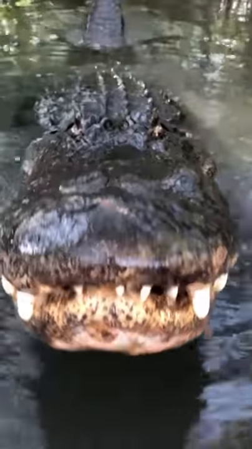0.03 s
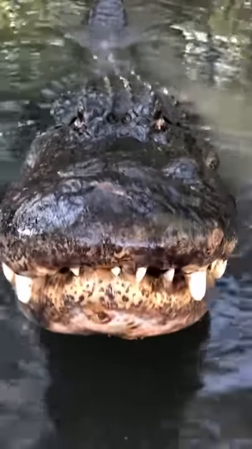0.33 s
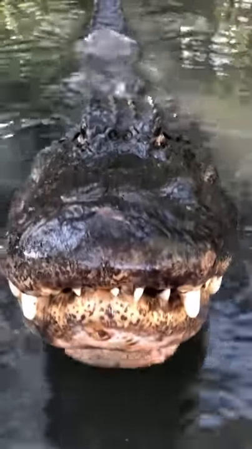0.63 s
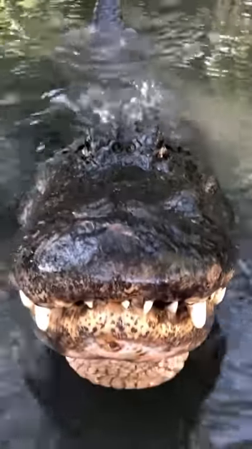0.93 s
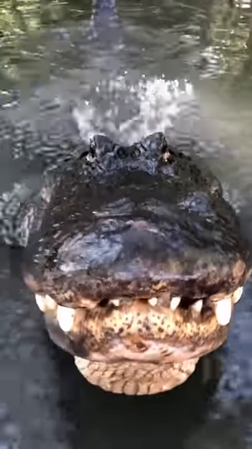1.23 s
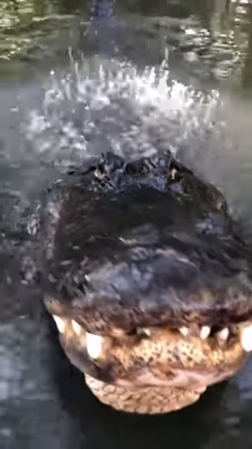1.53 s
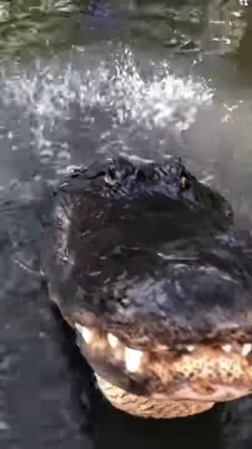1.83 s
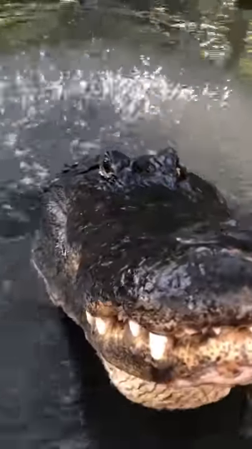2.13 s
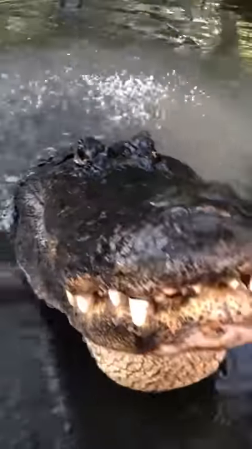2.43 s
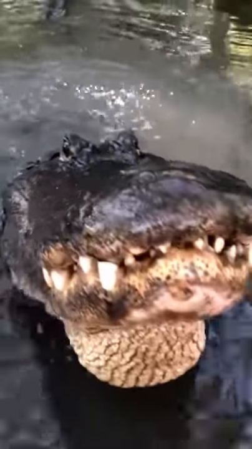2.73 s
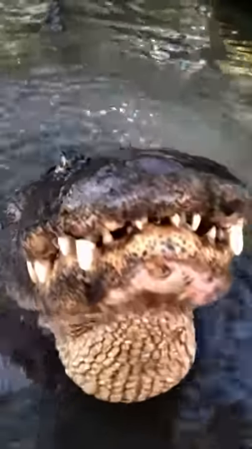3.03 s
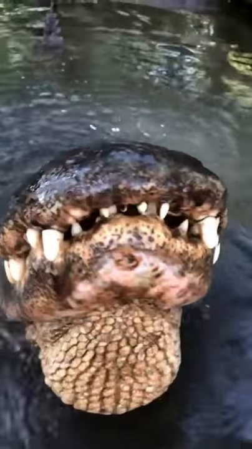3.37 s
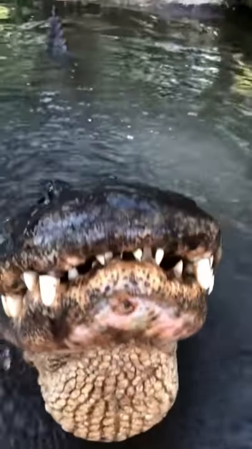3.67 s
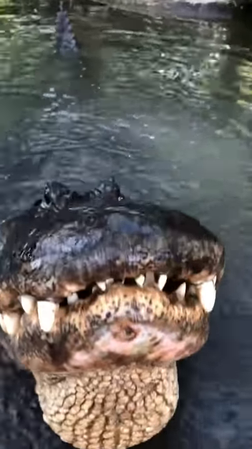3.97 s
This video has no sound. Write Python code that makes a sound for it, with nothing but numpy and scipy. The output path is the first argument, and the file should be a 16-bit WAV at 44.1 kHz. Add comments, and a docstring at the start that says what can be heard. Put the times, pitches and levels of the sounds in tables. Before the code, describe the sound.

Close to the microphone outdoors, an alligator makes a low pulsing rumble while water sprays and plops around it. It then breaks into a loud, hissing, guttural bellow that slows into rapid grunts.

```python
"""A pond, the microphone just in front of an alligator's snout. Water trickles and a bird whistles once;
then the animal's body throbs 15-19 times a second and throws up spray from its back. After a far bird's
thin note the throat opens into a roaring bellow: irregular slaps of the vocal folds boom in the body
and gate a rush of air through the throat, slowing into separate grunts."""
import sys
import numpy as np
from scipy import signal
from scipy.fft import rfft, irfft
from scipy.io import wavfile
from scipy.ndimage import uniform_filter1d

SR = 44100
rng = np.random.default_rng(int(sys.argv[2]) if len(sys.argv) > 2 else 0)


def wav_out(sig):
    """Save sig, one row per channel (or a flat mono array), as 16-bit PCM at SR to the path in sys.argv[1]."""
    wavfile.write(sys.argv[1], SR, np.round(np.clip(np.atleast_2d(sig).T, -1, 1) * 32767).astype(np.int16))


N = 176400
T = np.arange(N) / SR


def amp(db):
    """Decibels to gain."""
    return 10 ** (np.asarray(db) / 20)


def unit(x, start=0, end=4):
    """Scales to rms 1 over a span of seconds."""
    return x / np.sqrt(np.mean(x[int(start * SR):int(end * SR)] ** 2) + 1e-20)


def curve(rows, column=1):
    """Joins one column of a time table by straight lines."""
    rows = np.array(rows)
    return np.interp(T, rows[:, 0], rows[:, column])


def level(rows, column=1):
    """Gain from a table of decibels; silent before its first point."""
    return amp(curve(rows, column)) * (T >= rows[0][0])


def noise():
    """White noise."""
    return rng.standard_normal(N)


def wander(hz):
    """Random drift of rms 1, mostly slower than hz."""
    return unit(irfft(rfft(noise()) * np.exp(-(np.fft.rfftfreq(N, 1 / SR) / hz) ** 2), N))


def colour(x, points):
    """Causal filter through points of f/Hz, gain/dB."""
    hz, db = np.transpose(points)
    f = abs(np.fft.fftfreq(16384, 1 / SR)) + 1
    log_gain = np.log(amp(np.interp(np.log(f), np.log(hz + 1), db)))
    response = np.fft.ifft(np.exp(np.conj(signal.hilbert(log_gain)))).real
    return signal.fftconvolve(x, response[:len(f) // 2])[:N]


def patchy(x, patch_db):
    """Lets small patches of time and pitch stand out at random."""
    spectra = signal.stft(x, nperseg=512)[2]
    field = rng.standard_normal(spectra.T.shape).T
    field = uniform_filter1d(uniform_filter1d(field, size=3, axis=0), size=6, axis=1)
    return signal.istft(spectra * amp(patch_db * field / field.std()), nperseg=512)[1][:N]


def resonate(x, hz, width, order=1):
    """A resonance of gain 1 that can follow a curve; steeper with higher order."""
    turn = np.exp(2j * np.pi * np.cumsum(hz * np.ones(N)) / SR)
    pole = np.exp(-np.pi * width / SR)
    z = x / turn
    for _ in range(order):
        z = signal.lfilter([1 - pole], [1, -pole], z + 1e-18)
    return 2 * (turn * z).real


def throat(x, table, stretch=1, wobble=0):
    """Steep resonances that stretch together; each wavers on its own by the share wobble."""
    out = 0
    for hz, width, db in table:
        waver = wobble * wander(hz=25) if wobble else 0
        out += amp(db) * resonate(x, hz * (stretch + waver), width, order=2)
    return out


def beats(rate):
    """Times of the pulses along a rate curve."""
    turns = np.cumsum(curve(rate) * (T >= rate[0][0])) / SR
    return T[1:][np.diff(np.ceil(turns)) > 0]


def clicks(times):
    """Unit impulses at the given times."""
    return np.bincount(np.round(times * SR).astype(int), minlength=N)[:N] * 1.


def grains(per_s, spread_db):
    """Random clicks of uneven size and sign."""
    hits = (rng.random(N) < per_s / SR) * np.sign(noise())
    return hits * amp(spread_db * np.minimum(rng.exponential(1, N), 3))


def bubble(hz, decay, rise):
    """A ring that rises in pitch and is cut short as the bubble surfaces."""
    t = T[:SR // 12]
    tone = np.sin(2 * np.pi * hz * (t + rise * t ** 2 / 2))
    return tone * np.exp(-(t / decay) ** 2) * (1 - np.exp(-t * hz))


def bubbles(strength, per_s, low_hz, high_hz, cycles=10, sizes=24):
    """Many bubbles of many sizes, as loud as the strength curve."""
    out = 0
    for hz in np.geomspace(low_hz, high_hz, sizes):
        ring = bubble(hz, cycles / hz, rise=16)
        births = strength * unit(grains(per_s / sizes, spread_db=2.0))
        out += signal.oaconvolve(births, ring / np.linalg.norm(ring))[:N]
    return out / np.sqrt(sizes)


# ambience at the pond: f/Hz, gain/dB
POND_SPECTRUM = [(15, -45), (25, -21), (45, -3.5), (113, 0.5), (221, -6), (260, 1.5), (331, -9),
                 (1270, -13), (3930, -14), (7000, -19), (8500, -26), (15500, -31)]


def pond(db=-47):
    """Steady outdoor wash around the microphone."""
    return unit(colour(noise(), POND_SPECTRUM)) * amp(db + 0.6 * wander(hz=11.0))


# water trickling nearby: t/s, level/dB
TRICKLE_DB = [(0, -76), (.4, -60), (.8, -57), (1.2, -50.5), (1.8, -42), (2.2, -50), (2.6, -59.5)]
# spurts off the back: t/s, relative peak/dB
SPURTS = [(.452, -35), (1.186, -25.5), (1.2466, -27), (1.3089, -27), (1.3898, -25.5), (1.447, -23.5),
          (1.513, -22), (1.573, -22), (1.6422, -22.5), (1.704, -20), (1.7674, -21.5), (1.825, -23),
          (1.8878, -24.5), (1.9456, -28.5), (1.9864, -31), (2.0016, -24.5), (2.0987, -26.5), (2.162, -32),
          (2.318, -30.5)]
# spray at close range: f/Hz, gain/dB
SPRAY_SPECTRUM = [(350, -29), (520, -10), (901, -3), (2070, -2.5), (3300, -3.5), (4770, -12), (6830, -10.5),
                  (8120, -16), (15500, -23)]


def water(rise_s=0.0055, fall_s=0.018, spray_db=-10.5, bubbles_db=-20.5):
    """Spray leaps from the back in spurts; drops fall into the pond and ring as bubbles."""
    spurts = sum(amp(db) * np.exp(-np.maximum((s - T) / rise_s, (T - s) / fall_s)) for s, db in SPURTS)
    drops = colour(grains(per_s=3000, spread_db=4.5), SPRAY_SPECTRUM)
    spray = spurts * unit(patchy(drops, patch_db=4.5))
    bubbling = bubbles(spurts, per_s=320, low_hz=903, high_hz=3940)
    trickle = bubbles(amp(curve(TRICKLE_DB)), per_s=220, low_hz=604, high_hz=3540)
    return amp(spray_db) * spray + amp(bubbles_db) * bubbling + trickle


# the bird's lower voice: t/s, f/Hz, level/dB
WHISTLE = [(.535, 2780, -53), (.56, 2790, -42), (.578, 2730, -37.5), (.62, 2776, -39.5), (.675, 2830, -42),
           (.735, 2690, -53)]


def bird(upper_ratio=1.102, upper_db=-4, overtone_db=-19, echo_db=-8):
    """One thin two-voiced whistle with an echo from the trees."""
    lower = 2 * np.pi * np.cumsum(curve(WHISTLE) * (1 + 0.0036 * wander(hz=80))) / SR
    upper = upper_ratio * lower + 0.72 * wander(hz=40)
    voices = np.sin(lower) + amp(upper_db) * np.sin(upper) + amp(overtone_db) * np.sin(lower + upper)
    call = voices * level(WHISTLE, column=2) * (T < WHISTLE[-1][0])
    tail = noise() * np.exp(-T / 0.13)
    return call + amp(echo_db) * signal.fftconvolve(call, tail / np.linalg.norm(tail))[:N]


# single drops near the microphone: t/s, f/Hz, level/dB, decay/s, pitch rise/(share per s)
PLOPS = [(.968, 1200, -41, 0.018, 18), (1.19, 3580, -31.5, 0.0033, 8), (1.58, 2470, -27, 0.0053, 10),
         (1.586, 867, -28, .014, 15), (1.636, 475, -37.5, 0.025, 21), (1.764, 777, -32.5, 0.019, 44),
         (1.889, 955, -35.5, 0.017, 27), (2.005, 805, -37, 0.033, 2.8), (2.055, 1540, -19, 0.0026, 34),
         (2.1, 760, -38, .028, 18), (2.212, 657, -41, 0.021, 22), (2.316, 3100, -32, .004, 10)]


def plops():
    """Each drop leaves a bubble with a rising, unsteady ring."""
    out = np.zeros(N)
    for s, hz, db, decay, rise in PLOPS:
        ring = bubble(hz, decay, rise)
        out[round(s * SR):][:len(ring)] += ring * amp(db + 2 * wander(hz=150)[:len(ring)])
    return out


# throbs of the body: t/s, rate/Hz
THROB_RATE = [(1.162, 14.66), (1.4, 14.78), (1.7, 16.88), (2.1, 19.23), (2.4, 19.37)]
# its resonances: f/Hz, width/Hz, gain at first/dB, gain once sunk/dB
BODY_MODES = [(68.5, 8.4, -11.5, -1), (145, 17.7, -2, -5.5), (223, 24.3, -16, 4.5), (293, 64, -16, -18),
              (334, 8.4, -10.5, -4.5)]
# the thumps and the hum under them, close up: t/s, level/dB
THUMP_DB = [(1.16, -44), (1.23, -35.5), (1.6, -33), (1.69, -37.5), (1.92, -41.5), (2.07, -47.5),
            (2.22, -37.5), (2.3, -47), (2.39, -43.5), (2.45, -55.5), (2.7, -65)]
HUM_DB = [(1.15, -44.5), (1.5, -54), (1.9, -41), (2.3, -43.5), (2.7, -43)]


def throbs(sink_s=(1.38, 2.26)):
    """Each throb thumps the sinking body's resonances and feeds a deep hum."""
    times = beats(THROB_RATE)
    push = clicks(times[times < 2.8])
    sunk = np.interp(T, sink_s, (0, 1))
    thump = sum(resonate(push * amp(first + (last - first) * sunk), hz, width)
                for hz, width, first, last in BODY_MODES)
    thump = colour(thump, [(30, -13), (70, 2.5), (350, -5.5), (450, -35), (1000, -10)])
    hum = resonate(push, hz=44, width=13.4, order=2)
    return unit(hum, 1.2, 2.2) * amp(curve(HUM_DB)) - unit(thump, 0.92, 2.46) * amp(curve(THUMP_DB))


# a high note from far off: t/s, f/Hz, level/dB
FAR_NOTE = [(2.43, 6570, -62), (2.51, 6620, -56), (2.63, 6200, -60)]


def far_bird():
    """A thin falling note, blurred by distance."""
    note = unit(resonate(noise(), curve(FAR_NOTE), width=130, order=2))
    return note * level(FAR_NOTE, column=2) * (T < FAR_NOTE[-1][0])


# breath straight at the microphone: t/s, level/dB
HISS_DB = [(2.55, -52.5), (2.72, -43), (2.81, -33), (2.86, -27.5), (2.9, -25), (3.2, -24.5), (3.45, -27),
           (3.62, -26.5), (4.0, -30)]
# its hiss and its lower rasp: f/Hz, gain/dB
HISS_SPECTRUM = [(1470, -28), (2500, -0.5), (3320, -4), (4640, -3.5), (7170, -5.5), (8230, -12),
                 (12000, -17), (15500, -28)]
RASP_SPECTRUM = [(200, -43), (380, 2), (550, 1), (900, 2), (2500, -7.5), (4000, -14)]


def breath(air, rasp_db=-8):
    """Rushing air swells ahead of the roar and hisses on through it."""
    hiss = unit(patchy(colour(air, HISS_SPECTRUM), patch_db=3.5), 2.85, 3.3)
    rasp = unit(colour(air, RASP_SPECTRUM), 2.85, 3.2)
    return (hiss + amp(rasp_db) * rasp) * level(HISS_DB)


# the narrow throat: f/Hz, width/Hz, gain/dB
OPENING_MODES = [(137, 64, 2), (254.7, 18, 2), (317.5, 42, 6.5), (734, 40, 2.5), (871, 38, -0.5),
                 (1168, 38, -4.5), (1350, 63, 0.5), (1854, 47, -2), (2013, 63, -4.5), (2273, 83, -6.5),
                 (2483, 68, -5.5)]
# its hum: t/s, level/dB
OPENING_DB = [(2.68, -52), (2.738, -36.5), (2.748, -26), (2.8, -23), (2.85, -20.5), (2.9, -21.5),
              (2.95, -32.5)]


def opening():
    """Air hums through the throat as it first opens."""
    return unit(throat(noise(), OPENING_MODES)) * level(OPENING_DB)


# growl in the first half of the roar: t/s, f/Hz, level/dB
GROWL = [(2.79, 150, -33), (2.85, 142.8, -13), (2.93, 115.8, -13.5), (3.03, 135.8, -13.5),
         (3.11, 96.6, -12.5), (3.29, 90, -17.5)]


def growl(jitter=0.0608, octave_db=-6.5):
    """At full effort the folds buzz with a rough, sagging pitch."""
    phase = 2 * np.pi * np.cumsum(curve(GROWL) * (1 + jitter * wander(hz=59.8))) / SR
    buzz = unit(np.sin(phase) + amp(octave_db) * np.sin(2 * phase))
    return buzz * level(GROWL, column=2) * (T < GROWL[-1][0])


# flutter of the vocal folds: t/s, rate/Hz
FLUTTER_RATE = [(2.838, 24.5), (3.13, 24.1), (3.25, 22.8), (3.42, 22.3), (3.7, 20.42), (4.0, 17.03)]
# its unsteadiness: t/s, factor on the jitter
UNSTEADY = [(2.85, 0.92), (3.2, 0.89), (3.3, 0.24), (3.7, .2)]
# second slap: t/s, delay/s
SECOND_DELAY = [(2.85, 0.0085), (3.0, .014), (3.15, 0.01387), (3.3, 0.013), (3.6, 0.01096), (3.95, 0.01)]
# third slap, dying away as effort falls: t/s, gain/dB
THIRD_DB = [(2.85, -1), (3.05, 0.5), (3.45, -1.5), (3.55, -7.5), (3.8, -10.5)]


def fold_slaps(jitter_s=0.0014, second_db=-2, third_delay_s=0.0282):
    """The vocal folds slap three times in each flutter, never quite on time."""
    times = beats(FLUTTER_RATE)
    slip = jitter_s * np.interp(times, *np.transpose(UNSTEADY)) * rng.standard_normal((len(times), 3)).T
    first = clicks(times + slip[0] / 2)
    second = clicks(times + np.interp(times, *np.transpose(SECOND_DELAY)) + slip[1])
    third = clicks(times + third_delay_s + slip[2])
    return first + amp(second_db) * second + amp(curve(THIRD_DB)) * third


def airflow(slaps, puff_s=0.01, leak=0.89, crackle_db=1.3):
    """Each slap lets a puff through on top of a steady rush of air."""
    puffs = uniform_filter1d(signal.lfilter([1], [1, -np.exp(-1 / (puff_s * SR))], slaps), size=130)
    gate = np.where(T < FLUTTER_RATE[0][0], 1, leak + puffs)
    return gate * amp(crackle_db * wander(hz=296)) * noise()


# the booming body: f/Hz, gain/dB
BOOM_SPECTRUM = [(20, -42.5), (35, -26), (48, -9.5), (70, -3), (135, 2), (185, -5), (250, -6.5), (295, -13),
                 (335, -29.5), (600, -38), (1500, -74)]
# chest resonances: f/Hz, width/Hz, gain/dB
CHEST_MODES = [(45.6, 20, 6.5), (67, 27, 0.5), (178.4, 18, -3.5), (249.7, 48.4, 2)]
# boom and chest, close up: t/s, level/dB
BOOM_DB = [(2.8, -15), (3.0, -12), (3.33, -9.5), (3.52, -10), (3.65, -12.5), (4.0, -12)]
CHEST_DB = [(2.83, -24), (3.0, -16.5), (3.45, -18.5), (4.0, -22.5)]


def boom(slaps, air):
    """The slaps boom in the body, and the chest rings on between them."""
    body = colour(0.012 * air - slaps, BOOM_SPECTRUM)
    chest = sum(amp(db) * resonate(-slaps, hz, width, order=3) for hz, width, db in CHEST_MODES)
    return unit(body, 2.85, 3.44) * level(BOOM_DB) + unit(chest, 2.85, 4.6) * level(CHEST_DB)


# sag of the throat: t/s, factor on its resonances
THROAT_SAG = [(3.0, 1.03), (3.3, 1)]


def throat_stretch(flex=0.0085):
    """The throat's resonances sag a little and flex with the flutter."""
    return curve(THROAT_SAG) + flex * np.sin(2 * np.pi * np.cumsum(curve(FLUTTER_RATE)) / SR)


# the open throat: f/Hz, width/Hz, gain/dB
THROAT_MODES = [(703.9, 29.3, 4), (785, 62, -6), (1022, 52, -1), (1106, 91, -11), (1489.5, 70, -3.5),
                (1743, 240, -12), (2025, 64, -5.5), (2154, 96, -4.5), (2769, 81, -12), (3340, 166, -18),
                (4570, 110, -19.5)]
# its ring in front of the snout: t/s, level/dB
RING_DB = [(2.8, -41), (2.9, -29.5), (2.96, -25.5), (2.99, -29), (3.015, -21), (3.15, -21), (3.5, -22),
           (3.87, -23.5), (3.94, -25.5), (4.0, -24)]


def throat_ring(air, flicker_db=2.4):
    """The gated air rings the open throat; the level flickers."""
    ring = unit(throat(air, THROAT_MODES, throat_stretch(), wobble=0.0045), 2.85)
    return ring * amp(flicker_db * wander(hz=31.0)) * level(RING_DB)


# wet cracks at close range: t/s, level/dB, decay/s
CRACKS = [(2.837, -17.5, 0.0048), (2.863, -12, 0.005), (2.888, -12, 0.0067)]
# their colour: f/Hz, gain/dB
CRACK_SPECTRUM = [(300, -24), (700, -5), (1500, -2), (3200, 3), (7000, -7), (15000, -27)]


def cracks():
    """The throat tears open in short bursts of wet clicks."""
    tear = sum(amp(db) * (T > s) * np.exp(-abs(T - s) / decay) for s, db, decay in CRACKS)
    return tear * unit(colour(grains(per_s=4400, spread_db=2.5), CRACK_SPECTRUM))


# the snarling throat: f/Hz, width/Hz, gain/dB
SNARL_MODES = [(455, 610, -13.5), (730, 55, 1), (812, 66, -2), (1310, 210, -12.5), (1730, 38, -3),
               (1808, 61, 2), (3300, 140, -17.5)]


def snarl(start_s=2.889, db=-15, decay_s=0.049, sag_per_s=0.6):
    """As the roar breaks through, a burst of air rings resonances that sag in pitch."""
    age = np.maximum(T - start_s, 0)
    burst = noise() * (age > 0) * np.exp(-age / decay_s)
    ring = throat(burst, SNARL_MODES, stretch=np.exp(-sag_per_s * age))
    return amp(db) * unit(ring, start_s, start_s + decay_s)


# the wet throat: f/Hz, width/Hz, gain/dB
GURGLE_MODES = [(2029, 81, 2), (2212, 94, -4.5), (3950, 290, -14), (4650, 590, -11.5), (6650, 1000, -29)]
# its gurgle: t/s, level/dB
GURGLE_DB = [(3.05, -52), (3.14, -23.5), (3.4, -44), (3.5, -25), (3.6, -20.5), (3.75, -28), (3.86, -28),
             (3.93, -24.5), (4.0, -41)]


def gurgle(delay_s=0.0094, width_s=0.012):
    """A wet swell of air follows each late flutter."""
    swells = sum(np.exp(-((T - s - delay_s) / width_s) ** 2) for s in beats(FLUTTER_RATE))
    return unit(throat(swells * noise(), GURGLE_MODES, throat_stretch()), 3.3) * level(GURGLE_DB)


# grunts at the end of the roar: t/s, peak level/dB
GRUNT_DB = [(3.5, -31), (3.72, -10.5), (4.0, -11)]


def grunts(high_hz=260, low_hz=89, drop_s=0.0024, swell_s=0.0093):
    """As effort falls, each flutter becomes a separate grunt whose pitch drops at once."""
    t = T[:SR // 12]
    hz = low_hz + (high_hz - low_hz) * np.exp(-t / drop_s)
    swell = t / swell_s * np.exp(1 - t / swell_s)
    grunt = -np.sin(2 * np.pi * np.cumsum(hz) / SR) * swell
    return signal.oaconvolve(clicks(beats(FLUTTER_RATE)) * level(GRUNT_DB), grunt)[:N]


def scene():
    """Everything in mono, heard from just in front of the snout."""
    surroundings = pond() + bird() + far_bird()
    throbbing = throbs() + water() + plops()
    onset = opening() + snarl() + cracks()
    slaps = fold_slaps()
    air = airflow(slaps)
    bellow = boom(slaps, air) + throat_ring(air) + breath(air) + gurgle() + growl() + grunts()
    return (surroundings + throbbing + onset + bellow)[None]


def record(dry, ceiling=0.95, edge_hz=15750):
    """The recorder overloads softly on the loudest peaks, then limits the band."""
    held = dry / (1 + (dry / ceiling) ** 8) ** (1 / 8)
    lowpass = signal.firwin(511, edge_hz, window=("kaiser", 9), fs=SR)
    return signal.oaconvolve(held, lowpass[None], "same")


dry = scene()
out = record(dry)
wav_out(out)
```